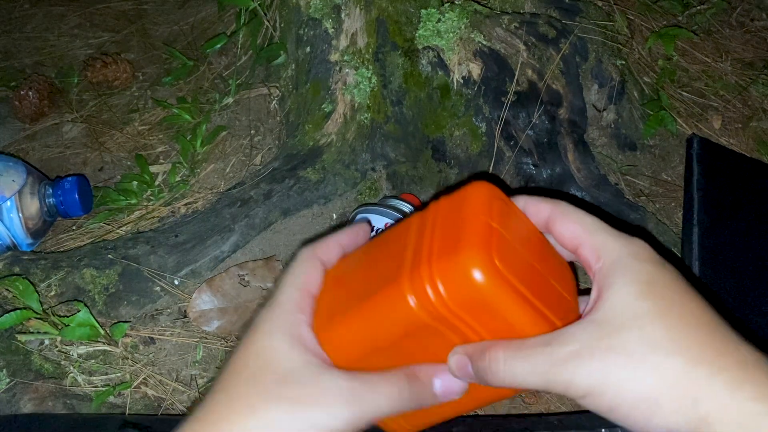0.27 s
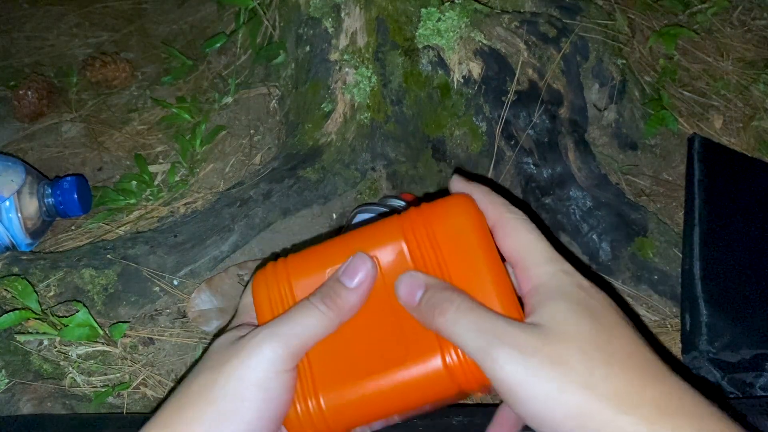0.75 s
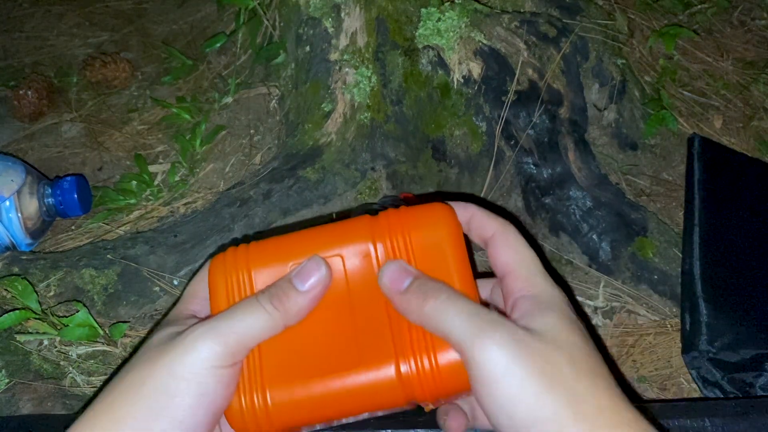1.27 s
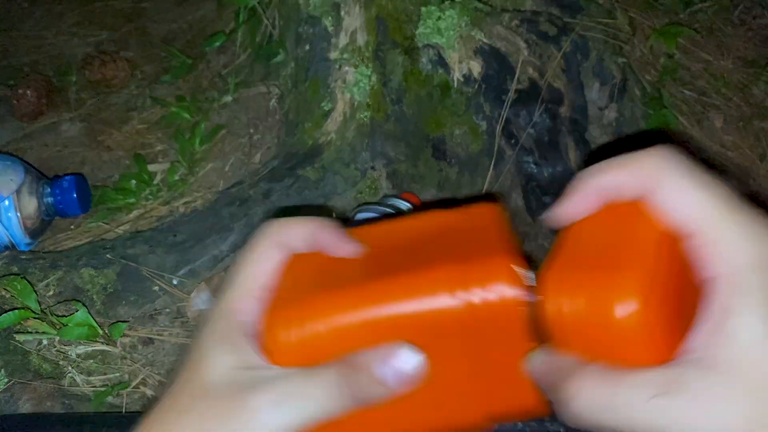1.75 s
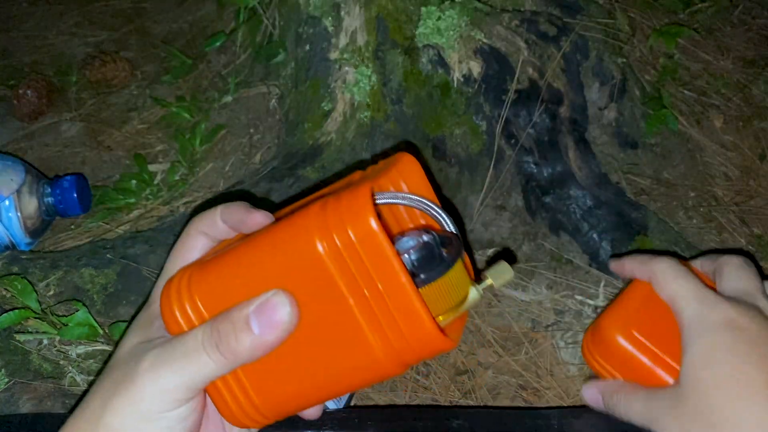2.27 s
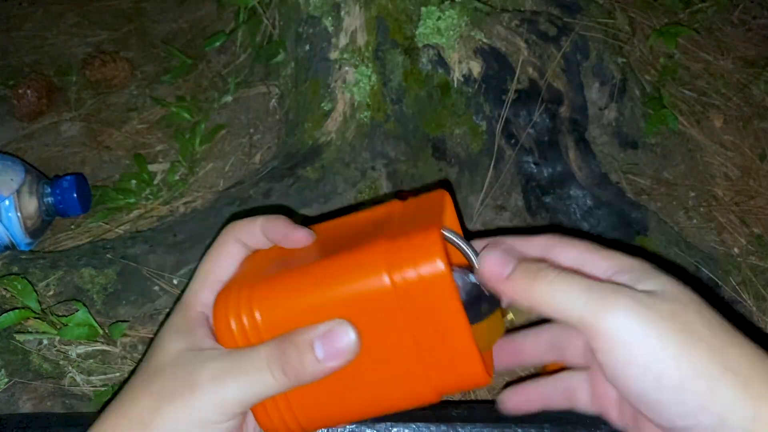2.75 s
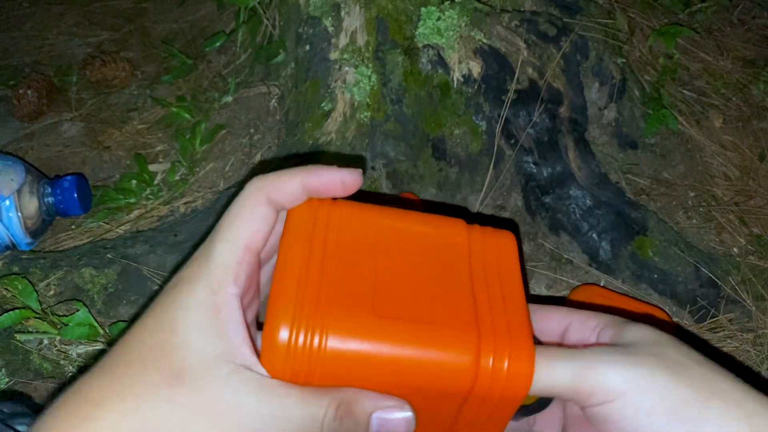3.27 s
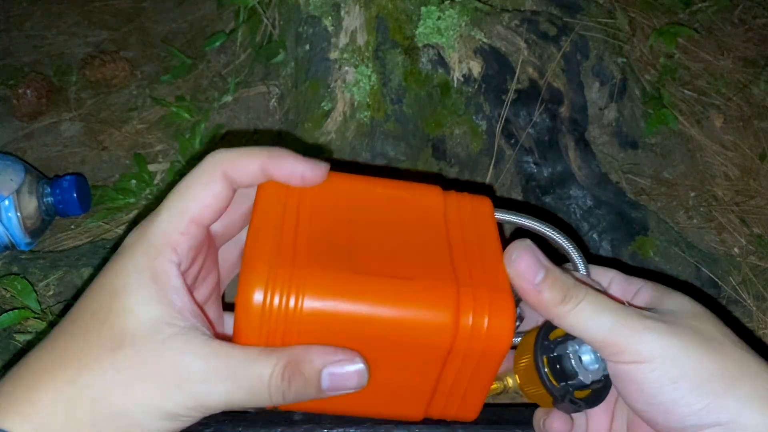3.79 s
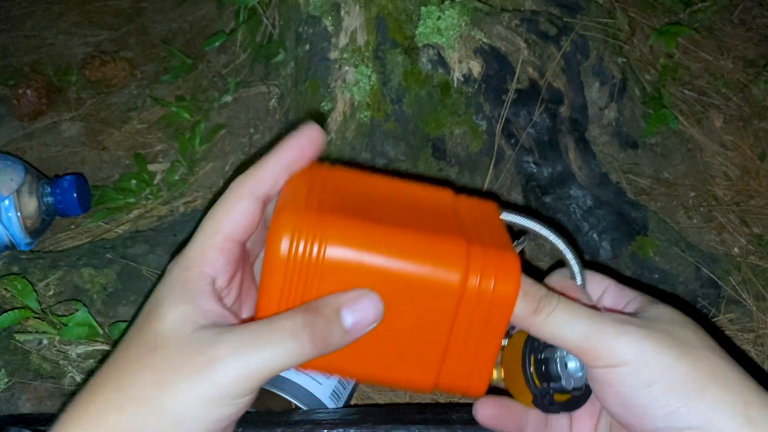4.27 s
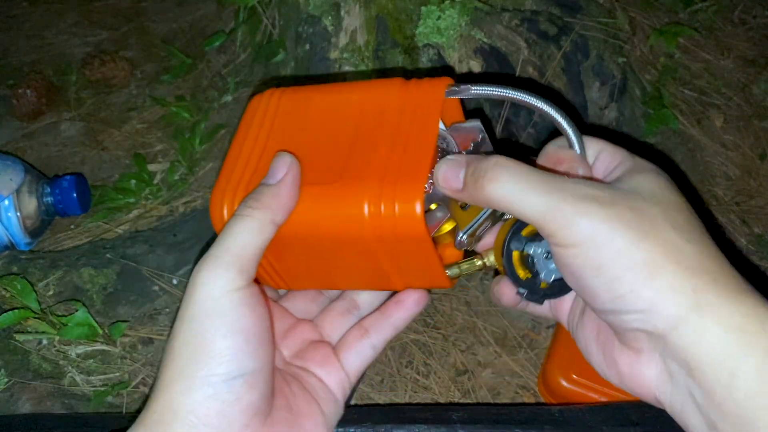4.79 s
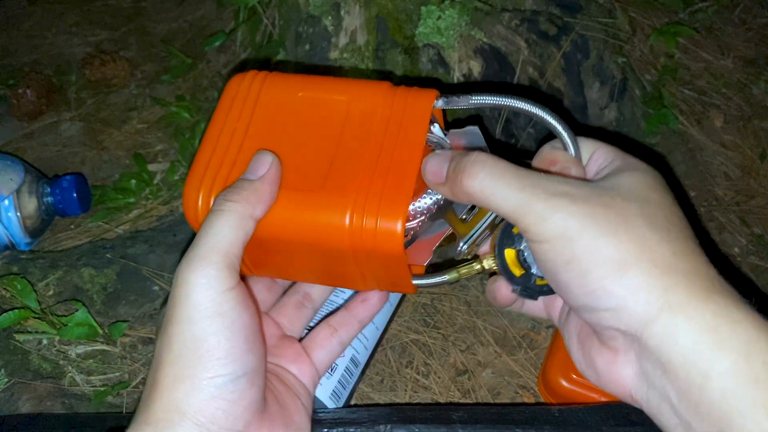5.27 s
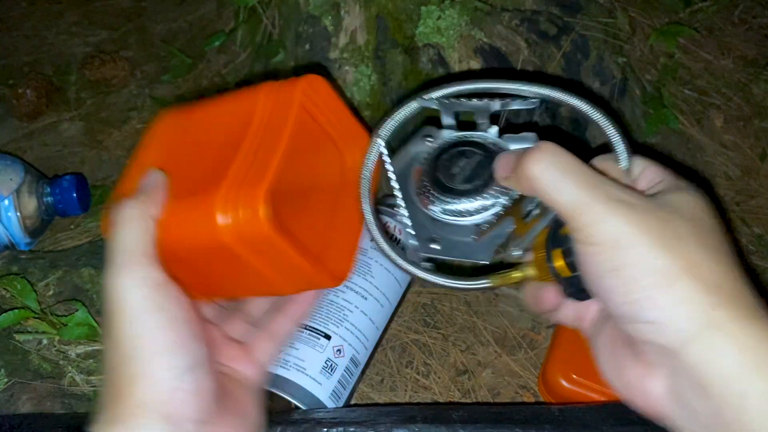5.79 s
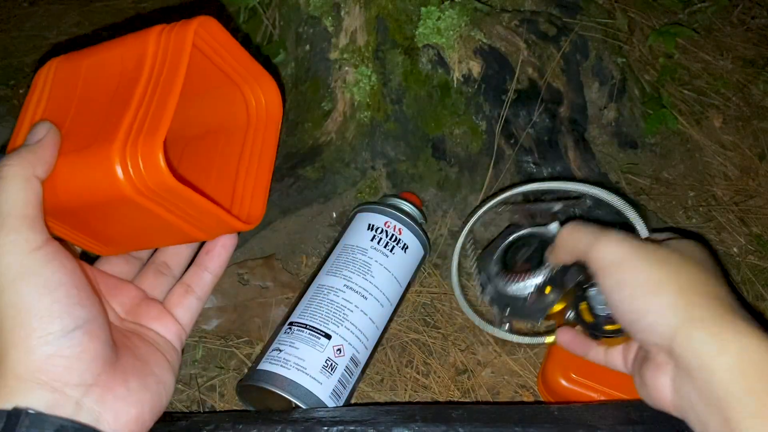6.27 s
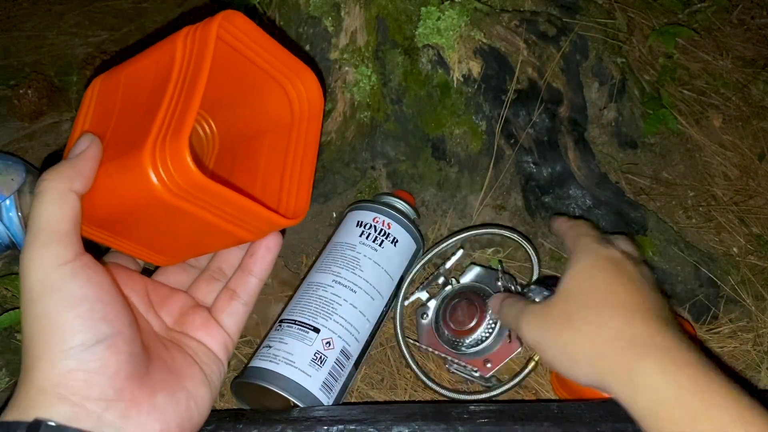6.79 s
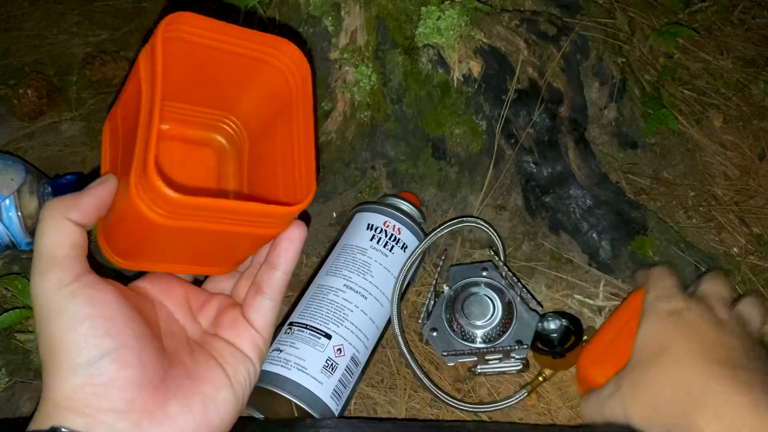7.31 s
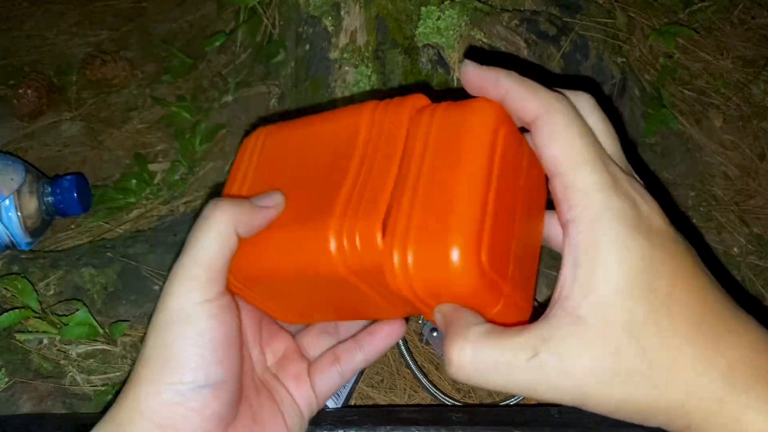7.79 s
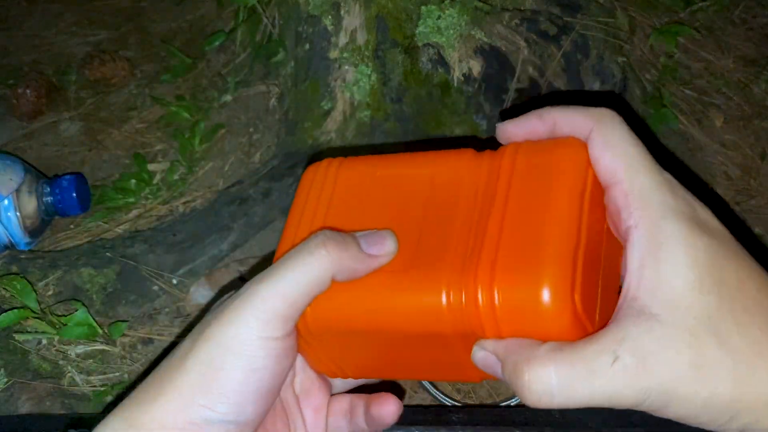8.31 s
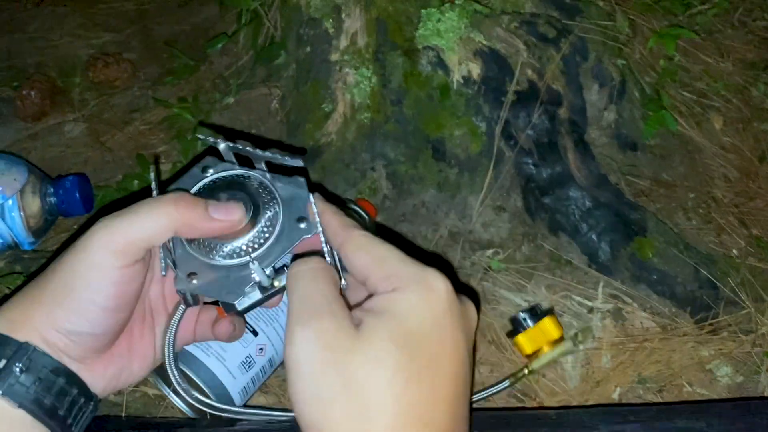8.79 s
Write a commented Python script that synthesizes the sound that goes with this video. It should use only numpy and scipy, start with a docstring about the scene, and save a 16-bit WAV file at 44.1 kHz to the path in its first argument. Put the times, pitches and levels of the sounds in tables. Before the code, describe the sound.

Very close to the microphone in a quiet night forest, dry needles rustle and twigs snap, then a hollow plastic case pops open and its lid bumps down. A metal stove rubs, ticks and scrapes inside, jerks free with a distorted clack, and knocks onto the ground. The lid is pushed back on with loud, stuttering hollow knocks. Low wind buffets and faint crickets lie behind.

```python
"""Forest floor at night: a hollow plastic case is opened close to the microphone and its lid laid down.
A folded metal stove is worked out, scraping and juddering, and set on the ground; the lid is pushed back on.
Knocks are decaying resonances plus gritty noise; scrapes are random slips driving the same kind of resonances.
Puffs of air are banded noise, dry needles rustle as grainy noise, crickets trill as swept tones and narrow hiss.
The hardest knocks overload the recorder: peaks are flattened at full scale."""
import sys
import numpy as np
from scipy import signal
from scipy.fft import rfft, irfft, next_fast_len
from scipy.io import wavfile

SR = 44100
rng = np.random.default_rng(int(sys.argv[2]) if len(sys.argv) > 2 else 0)


def wrap_up_sound(samples):
    """Save the sound to the file named by the first command line argument, as 16-bit audio."""
    columns = np.atleast_2d(samples).T
    # keep every value between -1 and 1, then stretch to whole-number steps
    tamed = np.clip(columns, -1, 1)
    steps = np.round(tamed * 32767).astype(np.int16)
    wavfile.write(sys.argv[1], SR, steps)


N = 399105
TIME = np.arange(N) / SR
FFT_SIZE = next_fast_len(N, real=True)
FFT_HZ = np.arange(FFT_SIZE // 2 + 1) * SR / FFT_SIZE

# Knocks hard and soft, mostly on case and lid; the last two are faint handling bumps
# [start_s, body_db, crack_db, pitch_hz]
HANDLING_KNOCKS = [ (1.063, -16, -28.5, 307), (1.778, -0.5, -16.5, 670), (1.789, -14, -15, 694),
                   (1.812, -4, -27, 706), (1.826, -11, -18, 794), (1.876, -23, -50, 730),
                   (1.89, -4, -33.5, 827), (2.994, -13, -24, 520), (3.199, -13, -28, 506),
                   (3.401, -14, -24, 834), (3.811, -20.5, -41, 834), (4.803, -21, -27, 763),
                   (4.847, -17, -25, 780), (5.218, -20.5, -40, 780), (5.356, -17.5, -26, 740),
                   (5.752, 3, -40, 822), (5.79, 8.5, 0, 787), (5.808, -7, -19, 540), (7.791, 1, -24.5, 394),
                   (7.812, 3.5, -17, 528), (7.927, 0.5, -32, 590), (7.979, -8.5, -20, 324),
                   (8.106, -14, -23, 283), (8.259, -2.5, -16.5, 539), (8.312, -13.5, -18, 498),
                   (8.342, -14.5, -30.5, 295), (8.45, -24.5, -28, 506), (8.597, -26.5, -59, 495),
                   (8.653, -26.5, -56, 450)]
# Resonances of the case with the stove inside [pitch_hz, width_hz, level_db]
FULL_CASE_MODES = [(305, 146, 1.5), (554, 86, 5), (766.3, 48, 11.5), (937, 55, 3), (1490, 24, -17.5),
                   (2131, 41, -9), (2640, 42, -20), (3108, 29, -11)]
# Resonances of the case once the stove is out [pitch_hz, width_hz, level_db]
EMPTY_CASE_MODES = [(325, 52, 10.5), (617, 73, 14.5), (904, 110, 10.5), (1460, 95, -8), (2024, 62, -11),
                    (2560, 170, -11)]
EMPTY_FROM_S = 6
# Light taps of stove and hose inside the case [start_s, level_db]
TAPS = [(2.892, -28), (2.977, -35.5), (3.242, -24), (3.261, -21.5), (3.601, -22.5), (3.705, -34),
        (3.919, -21.5), (4.27, -24.5), (4.387, -26), (4.706, -26.5), (4.974, -28), (5.123, -24),
        (5.333, -28.5), (5.512, -21.5)]
TAP_CLICK_DB = -10.5
# Lid and stove bumping on the ground [start_s, body_db, crack_db]
GROUND_KNOCKS = [(2.546, -8, -13), (6.868, 0, 2), (6.903, -17, -8), (6.96, -20, -19), (7, -21, -21),
                 (7.09, -17.5, -20.5)]
# Resonances of stove and lid lying against each other on the ground [pitch_hz, width_hz, level_db]
GROUND_MODES = [(615, 33, 6.5), (899, 41, 6.5), (1072, 37, 6.5), (1397, 100, -3), (1800, 120, -6.5),
                (2540, 260, -5.5)]
# Clinks of the stove's folded legs [start_s, level_db]
CLINKS = [(3.344, -30.5), (4.211, -35), (4.57, -38.5), (4.709, -44), (5.054, -35.5), (5.214, -45),
          (5.809, -11.5), (6.35, -35.5), (6.857, -22)]
# Resonances of the steel stove [pitch_hz, width_hz, level_db]
STOVE_MODES = [(3090, 45, -19.5), (4300, 63, -15.5), (5096, 150, -9), (6150, 68, -11.5)]
# Spectrum of contact cracks and grit [pitch_hz, level_db]
CRACK_SPECTRUM = [(300, -8.5), (1000, 17), (2400, 10.5), (6000, 3.5), (10000, 2.5), (14000, -12)]
# Strokes of a hand or the stove along the case wall [start_s, length_s, level_db]
STROKES = [(.77, 0.064, -37), (1.81, 0.057, -17.5), (2.995, 0.041, -22.5), (3.09, 0.034, -27.5),
           (3.275, 0.12, -17), (3.53, 0.027, -28), (4.14, 0.064, -30.5), (4.29, 0.054, -30),
           (4.78, 0.069, -19.5), (4.988, 0.023, -23.5), (5.21, 0.023, -20), (5.41, 0.016, -36),
           (5.75, 0.028, 4)]
STROKE_ATTACK, STROKE_RELEASE = 0.44, 0.45  # shares of a stroke's length
# Light rubbing while the stove is worked loose [start_s, length_s, level_db]
LIGHT_RUB = [(2.8, 2.92, -40)]
# Lid dragged over the ground [start_s, length_s, level_db]
LID_DRAGS = [(2.556, 0.037, -29), (6.88, 0.36, -33.5)]
# Pushes of the lid back onto the case [start_s, length_s, level_db]
LID_PUSHES = [(7.801, 0.019, -9), (7.897, 0.034, -7.5), (7.955, 0.023, -9.5), (8.076, 0.034, -23),
              (8.281, 0.027, -18)]
JUDDER_START_HZ, JUDDER_SAG_PER_S = 370, 4.5  # slip rate as a push begins; its exponential fall
# Movements stirring needles and sleeves [start_s, length_s, level_db]
RUSTLES = [(0, 0.3, -30.5), (.42, 0.2, -36), (1.52, 0.23, -39), (2.14, 0.21, -39.5), (2.56, 0.029, -31),
           (6.05, 0.53, -44), (8.71, 0.084, -34.5)]
RUSTLE_ATTACK, RUSTLE_RELEASE = 0.011, 0.35  # shares of a movement's length
# Spectrum of needles and sleeves [pitch_hz, level_db]
NEEDLE_SPECTRUM = [(150, 5.5), (600, 11.5), (2000, -1), (4000, -1), (10000, -6.5), (15000, -15)]
# Dry twigs snapping [start_s, level_db]
SNAPS = [(.075, -28), (.167, -20), (.213, -18.5), (.235, -22), (.265, -31), (.287, -18.5), (.322, -21),
         (2.151, -23), (7.157, -25), (7.365, -16.5)]
SNAP_HZ, SNAP_WIDTH_HZ, SNAP_FADE_S = 1390, 780, 0.0024
# Low thumps from the strongest eddies and from the hands [start_s, level_db, pitch_hz]
THUMPS = [(0.07, -20, 56), (0.635, -21, 58.6), (1.123, -10.5, 125), (1.226, 2, 310), (1.295, -7.5, 303),
          (2.377, -17.5, 61), (3.412, -21.5, 60), (3.882, -7.5, 151), (3.916, -2.5, 109),
          (3.947, -6.5, 120), (4.017, -5.5, 82), (6.054, 5.5, 128), (6.091, 3.5, 205), (6.154, 2, 283),
          (6.239, -2, 475), (6.388, -3, 475), (6.485, -9.5, 476), (6.537, -13, 427), (8.268, -3.5, 200)]
# Puffs of air over the microphone [start_s, length_s, level_db]
PUFFS = [(0, 4.85, -37), (1.017, 0.5, -18), (1.473, 1.16, -32), (3.856, 0.27, -21.5), (5.999, 0.52, -15.5),
         (6.43, 0.27, -30), (8.22, 0.15, -19)]
# Bouts of the nearer cricket [start_s, length_s, level_db]
TRILLS = [(0.25, 1.18, -42), (6.75, 1.66, -46)]
TRILL_ATTACK, TRILL_RELEASE = 0.15, 0.051  # shares of a bout's length
# Spectrum of the hush among the trees [pitch_hz, level_db]
FOREST_SPECTRUM = [(20, -56), (70, 1.5), (300, 2.5), (1200, -4), (4000, -8.5), (10000, -16), (15000, -36.5)]
# Left port's gain over the right [pitch_hz, level_db]
PORT_BALANCE = [(700, 0), (4200, 4.5), (8100, 0)]
RIGHT_PORT_LAG_S = 2.7e-5


def handling_knocks(width_hz=48, cavity_db=-3.5, walls_db=-7.0):
    """The main resonance shifts with grip and filling; the case walls ring along."""
    out, t = np.zeros(N), TIME[:SR // 2]
    for start_s, body_db, _, pitch_hz in HANDLING_KNOCKS:
        cavity = 2 * np.sin(2 * np.pi * pitch_hz * t) * np.exp(-np.pi * width_hz * t)
        walls = struck(FULL_CASE_MODES if start_s < EMPTY_FROM_S else EMPTY_CASE_MODES)
        knock = from_db(cavity_db) * cavity + from_db(walls_db) * walls
        add(out, start_s, from_db(body_db) * knock)
    crack = cracks(HANDLING_KNOCKS, fade_s=0.0018, tail_s=0.011, tail_db=-10.5, grain_db=2)
    return out + from_db(6.5) * crack


def sliding():
    """The stove rubs and rattles out along the case wall; the hand-damped lid drags over the ground."""
    working = swells(LIGHT_RUB, attack=0.015, release=0.024)
    stove_force = swells(STROKES, STROKE_ATTACK, STROKE_RELEASE) + working
    stove = rub(stove_force, FULL_CASE_MODES + STOVE_MODES, grit_db=-10.5)
    loose_parts = rattle(working)
    damped_modes = [(hz, 2 * width_hz, db) for hz, width_hz, db in GROUND_MODES]
    lid_force = swells(LID_DRAGS, RUSTLE_ATTACK, STROKE_RELEASE)
    return stove + loose_parts + rub(lid_force, damped_modes, grit_db=-6.0)


def rub(force, modes, grit_db):
    """Stick-slip drives a body's modes, which shift as the contact point moves, and gives off grit."""
    drive = slips()
    shift_s = .05 * drift(20) / 20  # wandering delay bends the pitch
    hollow = 0
    for k, mode in enumerate(modes):
        hollow = hollow + (-1) ** k * body(drive * force, [mode]) * from_db(2 * drift(20))
    hollow = np.interp(TIME + shift_s, TIME, hollow) / np.std(body(drive, modes))
    grit = rms_one(colour(drive, CRACK_SPECTRUM))
    return hollow + from_db(grit_db) * force * grit


def slips():
    """Stick and slip under an uneven push: fine chatter and sparser catches."""
    chatter = clicks(1600, spread_db=4)
    catches = clicks(55, spread_db=2.5)
    return (chatter + from_db(11) * catches) * from_db(3 * drift(45))


def rattle(force, per_s=16, knock_db=1.5):
    """While the stove moves, loose parts knock at random on two walls, ringing case and steel together."""
    out = np.zeros(N)
    for _ in range(2):
        touches = clicks(per_s, spread_db=3) * force
        out += signal.oaconvolve(touches, struck(FULL_CASE_MODES + STOVE_MODES))[:N]
    return from_db(knock_db) * out


def closing(jitter=0.14, grit_db=-9.0):
    """The tight lid judders onto the empty case in nearly regular slips, which slow down as it binds."""
    out, t = np.zeros(N), TIME[:SR // 5]
    for start_s, length_s, level_db in LID_PUSHES:
        sagging_hz = JUDDER_START_HZ * np.exp(-JUDDER_SAG_PER_S * t)
        slip_hz = sagging_hz * (1 + jitter * drift(JUDDER_START_HZ)[:len(t)])
        slip_pulses = np.diff(np.floor(np.cumsum(slip_hz) / SR), prepend=0)
        judder = slip_pulses * from_db(2 * rng.standard_normal(len(t)))
        force = swells([(0, length_s, level_db)], 0.84, STROKE_RELEASE)[:len(t)]
        hollow = body(judder * force, EMPTY_CASE_MODES) / np.std(body(judder, EMPTY_CASE_MODES))
        grit = force * noise(CRACK_SPECTRUM)[:len(t)]
        add(out, start_s, hollow + from_db(grit_db) * grit)
    return out


def ground_knocks():
    """Gear knocks on roots and soil, then settles with a weaker second touch."""
    out = np.zeros(N)
    for start_s, body_db, _ in GROUND_KNOCKS:
        add(out, start_s, from_db(body_db) * struck(GROUND_MODES))
        settle_s = (1 + rng.random()) / 280
        add(out, start_s + settle_s, from_db(body_db) / 2 * struck(GROUND_MODES))
    return out + cracks(GROUND_KNOCKS, fade_s=0.0003, tail_s=0.026, tail_db=-17.5, grain_db=6.0)


def taps():
    """Each light touch clicks, rings case and stove and rebounds once, its pitch varying with the grip."""
    out = np.zeros(N)
    for start_s, level_db in TAPS:
        rebound_s = (1 + rng.random()) / 200
        for delay_s, strength in ((0, 1), (rebound_s, .5)):
            grip = np.exp(rng.normal(0, .08))
            gripped_modes = [(hz * grip, width_hz, db) for hz, width_hz, db in FULL_CASE_MODES]
            ring = struck(gripped_modes + STOVE_MODES)
            add(out, start_s + delay_s, strength * from_db(level_db) * ring)
    return out + from_db(TAP_CLICK_DB) * colour(bursts(TAPS, fade_s=0.0055), CRACK_SPECTRUM)


def clinks():
    """Thin steel legs, damped by the hand, ring as decaying modes."""
    out = np.zeros(N)
    for start_s, level_db in CLINKS:
        add(out, start_s, from_db(level_db) * struck(STOVE_MODES))
    return out


def rustle(grain_db=3.5):
    """Sleeves hiss and dry needles give way in fine grains, with woody snaps among them."""
    hiss = rms_one(noise(NEEDLE_SPECTRUM) * from_db(grain_db * drift(1200)))
    snaps = resonate(bursts(SNAPS, SNAP_FADE_S), SNAP_HZ, SNAP_WIDTH_HZ)
    snaps = snaps * np.sqrt(SR / SNAP_WIDTH_HZ / np.pi)  # offsets the level lost in the narrow band
    return swells(RUSTLES, RUSTLE_ATTACK, RUSTLE_RELEASE) * hiss + snaps


def thumps():
    """Each is about one swing of low pressure, a little out of step on the two ports."""
    out = np.zeros((2, N))
    for start_s, level_db, pitch_hz in THUMPS:
        turn = (TIME[:SR // 10] - 1 / 20) * pitch_hz
        phases = rng.random() + rng.normal(0, .08, 2)  # turns
        for port, phase in zip(out, phases):
            swing = np.sin(2 * np.pi * (turn + phase)) * np.exp(-(turn / .7) ** 2)
            add(port, start_s - 1 / 20, from_db(level_db) * swing)
    return out


def wind(calm_hz=45, gust_hz=1150, tilt_db_per_octave=4.0):
    """A puff sets in fast, holds and dies away, lumpy throughout; stronger lumps reach higher in pitch."""
    power = 0
    for start_s, length_s, level_db in PUFFS:
        age_s = np.maximum(TIME - start_s, 0)
        puff = from_db(level_db) * np.tanh(age_s / .018) * np.exp(-(age_s / length_s) ** 6)
        power = power + puff ** 2
    lumps = rms_one(from_db(6 * np.tanh(drift(110) / 1.5)))
    flow = np.sqrt(power) * lumps
    reach_hz = calm_hz + gust_hz * flow ** (2 / 3)
    out = np.zeros((2, N))
    for hz in np.geomspace(54, 590, num=6):
        shared, apart = rng.standard_normal((2, N))
        eddies = shared + np.array([[1], [-1]]) * apart / 4  # ports partly differ
        pressure = eddies * flow * np.exp(-(hz / reach_hz) ** 3)
        band = signal.butter(3, [hz * 3 / 4, hz * 4 / 3], "band", fs=SR, output="sos")
        gain = from_db(tilt_db_per_octave * np.log2(hz / 200) - 2) * np.sqrt(SR / hz)
        out += gain * signal.sosfilt(band, pressure + 1e-18)
    return out


def crickets(pitch_hz=3185, wing_rate_hz=49, chorus_db=-48.0):
    """One cricket's wing strokes sag in pitch, blurred by the trees; a higher chorus is a narrow hiss."""
    stroke = np.cumsum(wing_rate_hz * (1 + .02 * drift(8))) / SR % 1  # 0 to 1 per wing stroke
    sagging_hz = pitch_hz + 150 * (.5 - stroke)
    tone = np.sin(2 * np.pi * np.cumsum(sagging_hz) / SR)
    trill = rms_one(np.sin(np.pi * stroke) ** 2 * tone)
    blur = rms_one(resonate(resonate(rng.standard_normal((2, N)), pitch_hz, 260), pitch_hz, 260))
    chorus = rms_one(resonate(resonate(rng.standard_normal((2, N)), 5100, 260), 5270, 230))
    near = swells(TRILLS, TRILL_ATTACK, TRILL_RELEASE) * (trill + blur) / np.sqrt(2)
    return near + from_db(chorus_db) * chorus


def forest():
    """The steady hush among the trees: shaped noise, partly different on each side."""
    sides = np.array([noise(FOREST_SPECTRUM), noise(FOREST_SPECTRUM)])
    return from_db(-42.5) * rms_one(noise(FOREST_SPECTRUM) + sides)


def from_db(db):
    """Decibels to amplitude."""
    return 10 ** (np.asarray(db) / 20)


def rms_one(x):
    """Scale to rms 1 over all channels together."""
    return x / np.sqrt(np.mean(x ** 2) + 1e-20)


def add(track, start_s, sound):
    """Lay a sound into a track."""
    start = max(0, round(start_s * SR))
    track[start:start + len(sound)] += sound[:N - start]


def colour(x, spectrum, lag_s=0):
    """Filter by a spectrum joined on a log-frequency axis, and delay."""
    hz, db = np.transpose(spectrum)
    gain = from_db(np.interp(np.log(FFT_HZ + 1), np.log(hz), db))
    delay = np.exp(-2j * np.pi * FFT_HZ * lag_s)
    return irfft(rfft(x, FFT_SIZE) * gain * delay, FFT_SIZE)[:N]


def noise(spectrum):
    """Noise of a given spectrum, rms 1."""
    return rms_one(colour(rng.standard_normal(N), spectrum))


def drift(rate_hz):
    """Random values joined by straight lines, rate_hz of them a second; rms 1."""
    knots = rng.standard_normal(N // 10)
    return rms_one(np.interp(TIME * rate_hz, np.arange(len(knots)), knots))


def resonate(x, hz, width_hz):
    """One two-pole resonance, gain 1 on top."""
    r = np.exp(-np.pi * width_hz / SR)
    zeros = np.array([1, 0, -1]) * (1 - r * r) / 2
    poles = [1, -2 * r * np.cos(2 * np.pi * hz / SR), r * r]
    return signal.lfilter(zeros, poles, x + 1e-18)


def body(x, modes):
    """Resonances in parallel, signs alternating."""
    return sum((-1) ** k * from_db(db) * resonate(x, hz, width_hz)
               for k, (hz, width_hz, db) in enumerate(modes))


def struck(modes):
    """One blow: decaying modes of randomly varied strength; unit level over the first 10 ms."""
    t = TIME[:SR // 2]
    hz, width_hz, db = np.transpose(modes)[:, :, None]
    strength = from_db(db + 2 * rng.standard_normal(hz.shape)) * np.sqrt(width_hz)
    strength = strength * rng.choice([-1, 1], hz.shape)
    ring = (strength * np.sin(2 * np.pi * hz * t) * np.exp(-np.pi * width_hz * t)).sum(0)
    return ring / np.std(ring[:SR // 100])


def cracks(rows, fade_s, tail_s, tail_db, grain_db):
    """The bright snap of each contact: a swell of about a millisecond, the peak, a weak gritty tail."""
    t = TIME[:SR // 4] - 1 / 20  # peak at 0
    after = np.maximum(t, 0)
    onset = np.exp(np.minimum(t, 0) / .0014)
    shape = onset * (np.exp(-after / fade_s) + from_db(tail_db) * np.exp(-after / tail_s))
    envelope = np.zeros(N)
    for start_s, _, crack_db, *_ in rows:
        add(envelope, start_s - 1 / 20, from_db(crack_db) * shape)
    return envelope * rms_one(noise(CRACK_SPECTRUM) * from_db(grain_db * drift(1600)))


def clicks(per_s, spread_db):
    """Clicks at random times; random sizes reach at most twice spread_db above the smallest."""
    hits = rng.random(N) < per_s / SR
    signs = rng.choice([-1, 1], N)
    return hits * signs * from_db(spread_db * np.minimum(rng.exponential(1, N), 2))


def swells(rows, attack, release):
    """A gain that rises, holds and dies away per row; longer events rise and fall more slowly."""
    power = 0
    for start_s, length_s, level_db in rows:
        age = (TIME - start_s) / length_s
        rise = np.clip(age / attack, 0, 1)
        fall = np.exp(-np.clip((age - 1) / release, 0, 20))
        power = power + (from_db(level_db) * rise * fall) ** 2
    return np.sqrt(power)


def bursts(rows, fade_s):
    """A tiny spray of noise per row, gone almost at once."""
    out, t = np.zeros(N), TIME[:SR // 10]
    for start_s, level_db in rows:
        add(out, start_s, from_db(level_db) * rng.standard_normal(len(t)) * np.exp(-t / fade_s))
    return out


def ports(x):
    """Two close ports: the right hears slightly later; each gets treble scatter off hands and ground."""
    left = colour(x, [(hz, db / 2) for hz, db in PORT_BALANCE])
    right = colour(x, [(hz, -db / 2) for hz, db in PORT_BALANCE], RIGHT_PORT_LAG_S)
    direct = np.array([left, right])
    paths = rng.standard_normal((2, SR // 20)) * np.exp(-TIME[:SR // 20] / .004)
    treble = signal.sosfilt(signal.butter(2, 1000, "high", fs=SR, output="sos"), direct)
    scatter = signal.oaconvolve(treble, paths / np.linalg.norm(paths[0]), axes=1)[:, :N]
    return direct + from_db(-4) * scatter


def scene():
    """Handling sounds reach the two ports; crickets, hush, wind and thumps are added."""
    handling = handling_knocks() + sliding() + closing() + ground_knocks() + taps() + clinks() + rustle()
    return ports(handling) + thumps() + wind() + crickets() + forest()


def record(dry):
    """Deep bass is cut, ports notch and lift the treble, peaks flatten at full scale, the top is cut."""
    dry = signal.sosfilt(signal.butter(3, 38, "high", fs=SR, output="sos"), dry)
    dry = dry - .7 * resonate(dry, 8450, 900) + .5 * resonate(dry, 10000, 1500)
    flattened = dry / (1 + dry ** 8) ** (1 / 8)
    top_cut = signal.cheby2(16, 60, 16300, fs=SR, output="sos")  # 60 dB down from 16300 Hz
    return signal.sosfilt(top_cut, flattened)


dry = scene()
out = record(dry)
wrap_up_sound(out)
```